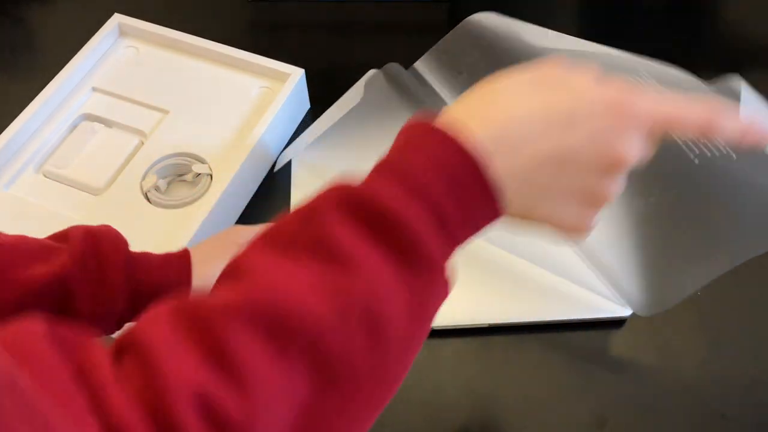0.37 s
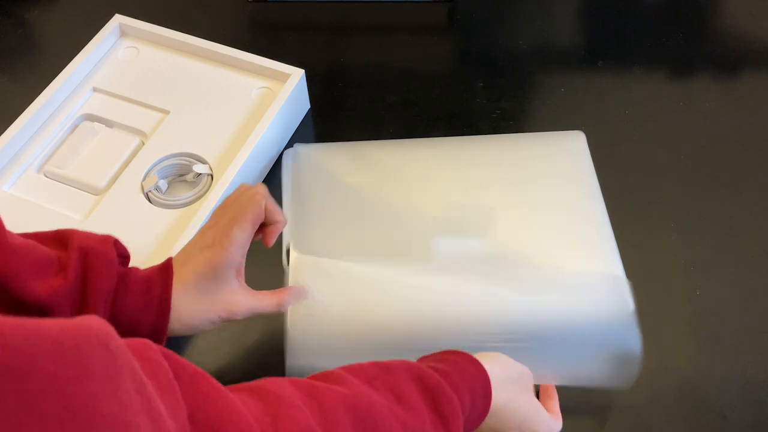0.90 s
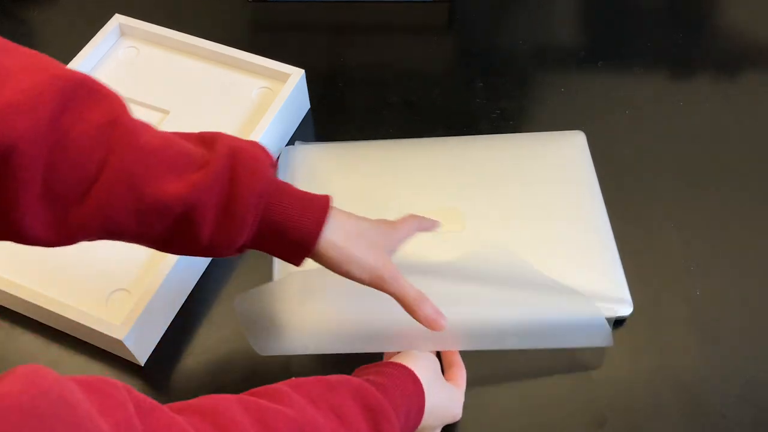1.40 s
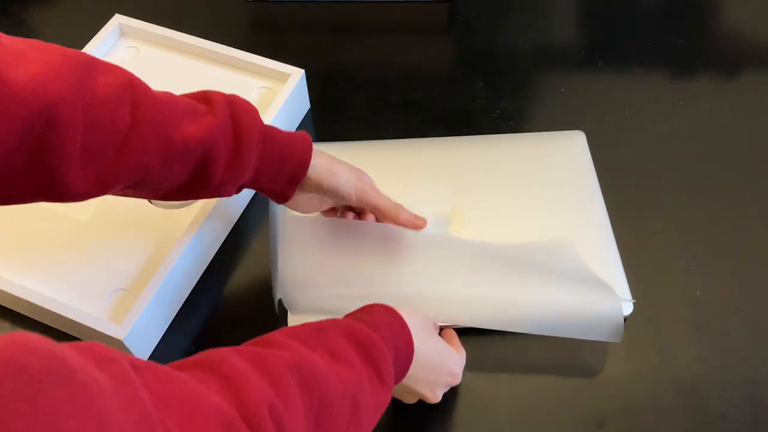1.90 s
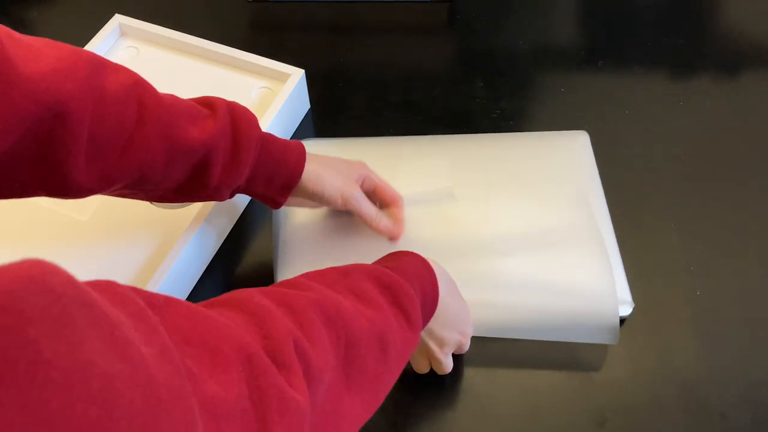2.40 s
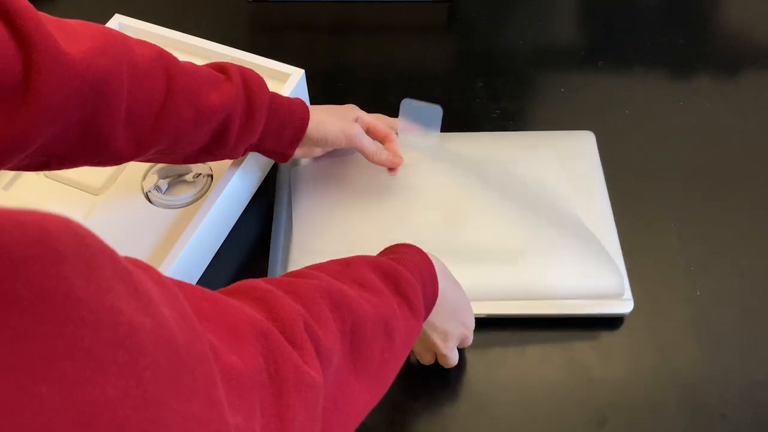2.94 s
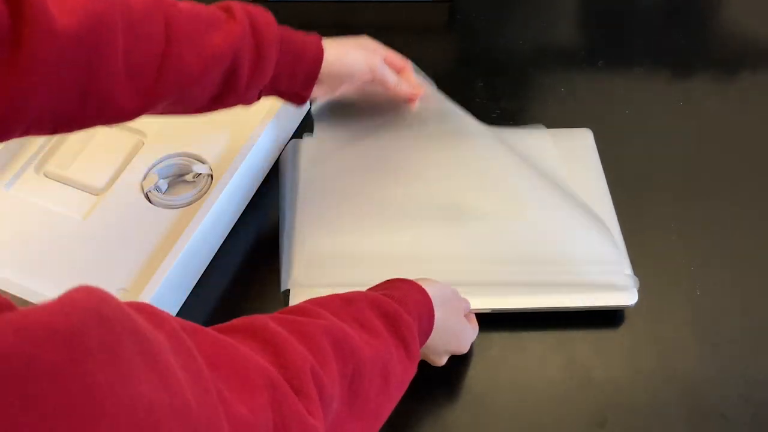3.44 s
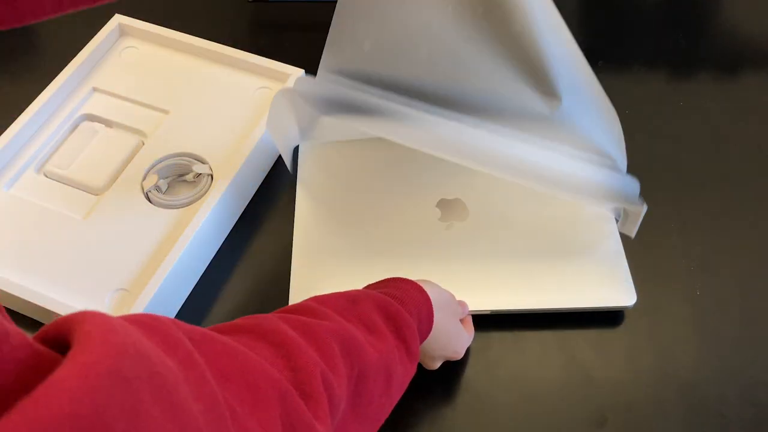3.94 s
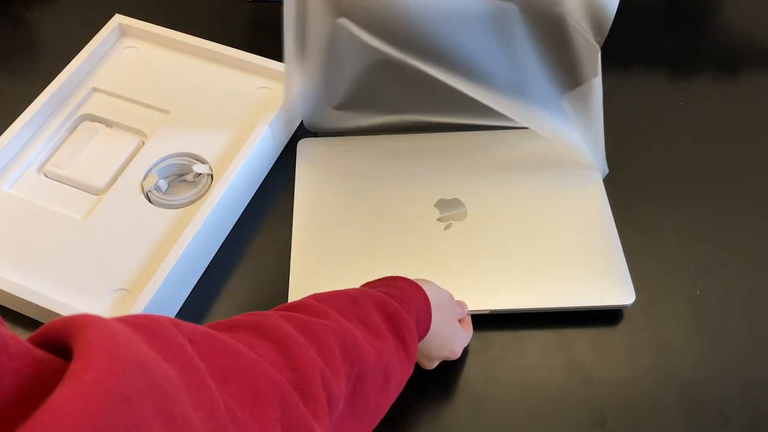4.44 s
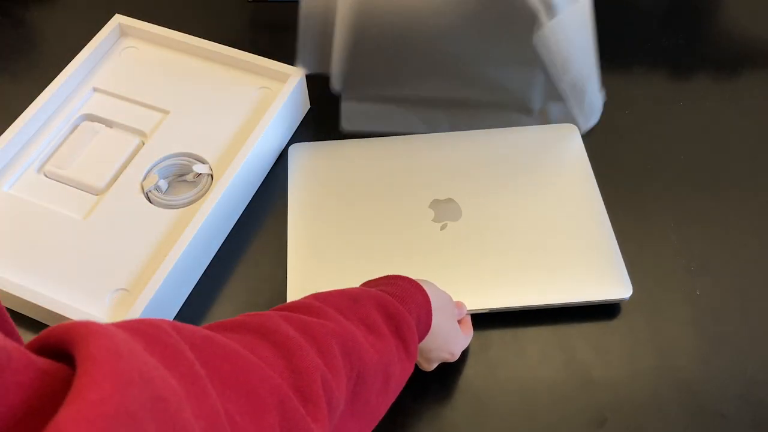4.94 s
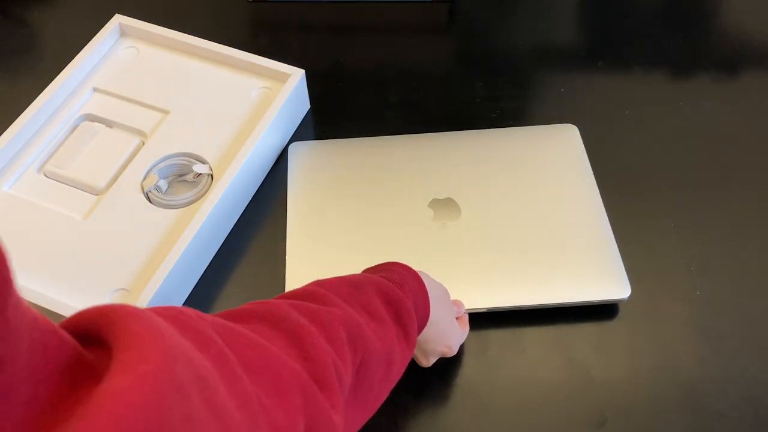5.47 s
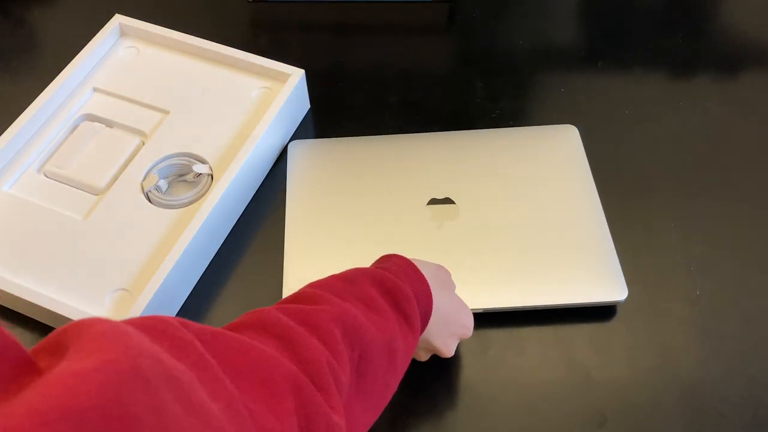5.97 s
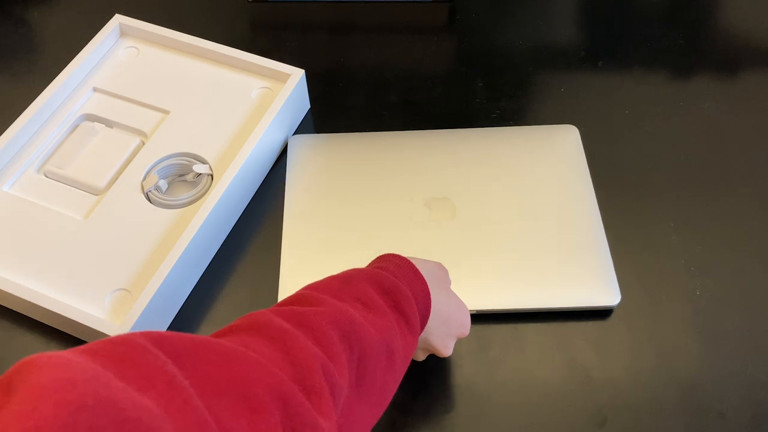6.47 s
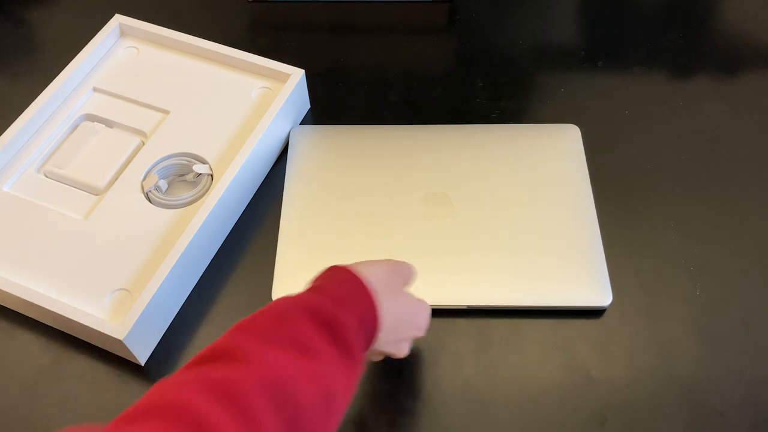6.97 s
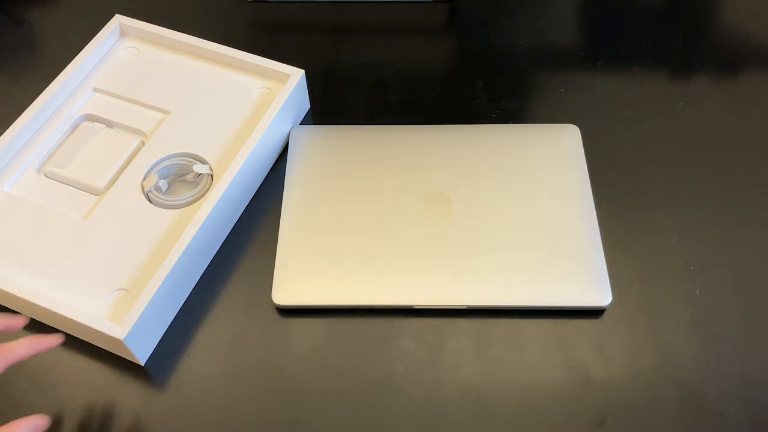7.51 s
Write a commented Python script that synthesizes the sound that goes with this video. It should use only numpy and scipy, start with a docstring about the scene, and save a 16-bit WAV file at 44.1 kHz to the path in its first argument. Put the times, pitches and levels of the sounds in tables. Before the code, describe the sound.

Crisp plastic sheet rustling and snapping, building to a bright burst of peeling, then near quiet with dry clicks, a low bump and a cloth brush.

```python
"""A thin plastic sheet is peeled off a metal case on a table, to one side of a hand-held camera.
It crinkles in grains that follow the hand, snaps in millisecond bursts, and its folds ring briefly.
Dry ticks (short bursts of grains) sound close to the microphone; the case knocks on the table
(decaying sines) and scrapes; a sleeve brushes by as filtered grains; a low room rumble of shaped
noise lies under all."""
import sys
import numpy as np
from scipy import signal
from scipy.fft import rfft, irfft
from scipy.io import wavfile
from scipy.ndimage import uniform_filter1d

SR = 44100
rng = np.random.default_rng(int(sys.argv[2]) if len(sys.argv) > 2 else 0)


def voltage_ratio(level):
    """Linear amplitude factor for a level in decibels (scalar or array-like)."""
    return 10 ** (np.asarray(level, float) / 20)


def unload_audio(sound):
    """Save the sound as a 16-bit wav file, at the path given as the first command line argument."""
    columns = np.transpose(np.atleast_2d(sound))
    # keep every value between -1 and 1, then stretch to whole-number steps
    steps = np.round(np.clip(columns, -1, 1) * 32767)
    wavfile.write(sys.argv[1], SR, steps.astype(np.int16))


N = 336042


def evened(x):
    """Scales to rms 1."""
    return x / np.sqrt(np.mean(x ** 2) + 1e-20)


def read(points, hz):
    """Reads a spectrum table on a log-frequency axis."""
    f, value = np.transpose(points)
    return np.interp(np.log(hz + 1), np.log(f + 1), value)


def colour(x, points):
    """Minimum-phase filter with the given spectrum, keeping the power of white noise."""
    log_gain = np.log(voltage_ratio(read(points, abs(np.fft.fftfreq(4096, 1 / SR)))))
    spectrum = np.exp(np.conj(signal.hilbert(log_gain)))
    taps = np.fft.ifft(spectrum).real[:2048]
    taps = taps / np.linalg.norm(taps)
    return signal.oaconvolve(x, taps[None], axes=1)[:, :N]


def pair(a, b, same, pan_db=0, lead_rad=0):
    """Left hears a; right hears a share of a, the rest from b, lagging in phase and at another level."""
    hz = np.fft.rfftfreq(N, 1 / SR)
    share = np.clip(read(same, hz), -1, 1)
    left = rfft(a)
    right = share * left + np.sqrt(1 - share ** 2) * rfft(b)
    right = right * np.exp(-1j * lead_rad)
    return irfft(np.array([left * voltage_ratio(pan_db / 2), right * voltage_ratio(-pan_db / 2)]), N)


def grains(per_s, spread_db, hiss):
    """Tiny clicks of uneven size in clumps, shared in time by two unlike draws, over some hiss."""
    clump_db = 2.5 * evened(uniform_filter1d(rng.standard_normal(N), 300))
    size_db = spread_db * np.minimum(rng.exponential(1, N), 4)
    size = voltage_ratio(clump_db) * voltage_ratio(size_db) * (rng.random(N) < per_s / SR)
    level = np.sqrt(evened(size) ** 2 + hiss)
    return evened(level * rng.standard_normal((2, N)))


def bursts(s, db, rise_s, fall_s):
    """Envelope of short bursts, each peaking at db."""
    at = np.zeros(N)
    np.add.at(at, np.round(np.asarray(s) * SR).astype(int), voltage_ratio(db))
    t = np.arange(round(min(0.5, 12 * fall_s) * SR)) / SR
    shape = (1 - np.exp(-t / rise_s)) * np.exp(-t / fall_s)
    return abs(signal.oaconvolve(at, shape / shape.max())[:N])


def split(db, tilt_db):
    """Shares a level between body and treble."""
    treble_db = db - 10 * np.log10(2.5 + 10 ** (tilt_db / 10))
    return treble_db + tilt_db, treble_db


def strokes(s, db, swell_ms, fade_ms):
    """Level in dB of overlapping gestures, each swelling to its peak and fading."""
    starting, stopping = 1.3, 1.1  # over 1: sets in and dies out abruptly rather than creeping
    step = 64  # samples
    ms = 1000 * (np.arange(0, N + step, step)[:, None] / SR - s)
    swell = abs(ms) / np.maximum(swell_ms, 3)
    fade = abs(ms) / np.maximum(fade_ms, 3)
    each_db = db - 20 * np.where(ms < 0, swell ** starting, fade ** stopping)
    power = 10 ** (np.maximum(each_db, -150) / 10)
    total_db = 10 * np.log10(power.sum(axis=1))
    return np.interp(np.arange(N) / step, np.arange(len(ms)), total_db)


def patchy(x, patchy_db):
    """Patches of the colour come and go within tens of milliseconds, as in a surface changing shape."""
    z = signal.stft(x, nperseg=256)[2]
    field = rng.standard_normal(z.shape[1:])
    field = uniform_filter1d(uniform_filter1d(field, 4, 0), 14, 1)  # over frequency, then time
    gain = voltage_ratio(patchy_db * evened(field))
    return signal.istft(z * evened(gain), nperseg=256)[1][:, :N]


# room spectrum: f/Hz, level/dB
ROOM_SPECTRUM = [(12, -36.5), (20, -8), (63, -0.5), (94, -0.5), (195, -11), (323, -16), (583, -25.5),
                 (816, -31), (1350, -36.5), (1950, -44), (2890, -45.5), (6000, -45), (7730, -45.5),
                 (15200, -55), (16500, -72)]
# room left-right likeness: f/Hz, likeness/1
ROOM_LIKENESS = [(60, 0.96), (180, 0.99), (550, 0.91), (1650, 0.17), (4970, 0.32), (15000, 0.18)]


def room():
    """Steady rumble of the building and faint hiss: shaped Gaussian noise."""
    level_db, pan_db = -50, -1.3  # pan: left over right
    hz = np.fft.rfftfreq(N, 1 / SR)
    noise = irfft(rfft(rng.standard_normal((2, N))) * voltage_ratio(read(ROOM_SPECTRUM, hz)), N)
    return voltage_ratio(level_db) * pair(*evened(noise), ROOM_LIKENESS, pan_db)


# tugs of the hand: t/s, force/dB, tension (treble over body)/dB, 20 dB swell/ms, 20 dB body fade/ms
HAND_TUGS = [(0.009, -62.5, -2, 74, 128), (0.223, -44.5, 0, 11, 136), (0.357, -57.5, -8.0, 232, 150),
             (0.539, -64.5, -19.5, 20, 129), (0.694, -60, 8.5, 68, 233), (0.736, -40.5, -8.5, 85, 142),
             (0.893, -49, -11, 45, 47), (0.952, -40.5, -2.5, 57, 89), (1.014, -49, 2.5, 64, 150),
             (1.195, -52.5, 2.5, 138, 200), (1.219, -45.5, 3.5, 60, 88), (1.319, -46.5, -1.5, 120, 165),
             (1.424, -62.5, 13.5, 122, 328), (1.51, -57, 1, 91, 606), (1.635, -57.5, 9.5, 68, 168),
             (1.68, -51.5, -16, 47, 245), (1.785, -59.5, 13, 101, 117), (1.904, -59.5, 6.0, 139, 293),
             (1.962, -53.5, -9, 41, 126), (2.114, -54.0, 1.5, 112, 222), (2.235, -63, 3.5, 40, 207),
             (2.288, -49.5, -7.5, 15, 156), (2.449, -51, 1, 75, 161), (2.583, -61.5, 14.0, 140, 208),
             (2.668, -54, -2, 12, 189), (2.718, -49, -2.5, 59, 140), (2.88, -76, 12.0, 129, 63),
             (2.977, -45.5, 0, 19, 138), (3.035, -55, -3, 32, 189), (3.245, -53.5, -7, 23, 94),
             (3.305, -55, 0.5, 89, 94), (3.414, -73, 15.0, 253, 600), (3.47, -56.5, -3, 8, 229),
             (3.523, -51, 15.5, 58, 312), (3.58, -39.5, 11.5, 35, 157), (3.671, -46, 7.5, 113, 102),
             (3.763, -36, 0.5, 123, 131), (3.824, -42.0, -2.5, 121, 152), (3.917, -49, -6.5, 79, 280),
             (4.085, -49.5, -8.0, 92, 265), (4.128, -38, 3.5, 18, 354), (4.19, -33, -2, 35, 244),
             (4.282, -39, 5.5, 15, 90), (4.38, -36, 4, 7, 248), (4.427, -34, -3.5, 85, 251.5),
             (4.59, -39.5, 1.5, 8, 201), (4.69, -42.5, -3.5, 256, 151), (4.745, -36.5, 4, 35, 227),
             (4.795, -34.5, 4.5, 79, 214), (4.866, -41.5, 3, 52, 156), (4.941, -33.5, 3.5, 186, 89),
             (4.962, -36.5, -6.5, 43, 118), (5.014, -47.5, -5, 46, 246), (5.177, -61, -15, 39, 141),
             (5.374, -69.5, 0.5, 146, 126), (5.517, -73, 5, 72, 420), (5.681, -60.5, -20, 112, 140)]


def tugs():
    """Hand force drives body, treble and flap levels in dB; a taut sheet cannot flap."""
    treble_fades_faster = 1.3
    flap_offset_db, flap_lost_per_tension = -10, 0.83
    s, force_db, tension_db, swell_ms, fade_ms = np.transpose(HAND_TUGS)
    body_db = strokes(s, force_db, swell_ms, fade_ms)
    treble_db = strokes(s, force_db + tension_db, swell_ms, fade_ms / treble_fades_faster)
    flap_force_db = force_db + flap_offset_db - flap_lost_per_tension * np.maximum(tension_db, -7)
    return body_db, treble_db, strokes(s, flap_force_db, swell_ms, fade_ms)


POP_RISE_S, POP_FALL_S = 0.00006, 0.0011


def small_pops():
    """Lesser creases pop at chance times and sizes; level is relative to the crinkle."""
    per_s, spread_db, over_db = 90, 2.5, -3
    s, size = rng.random((round(per_s * N / SR), 2)).T
    db = over_db - spread_db * np.maximum(np.log(size), -3)
    return bursts(s * (N - 1) / SR, db, POP_RISE_S, POP_FALL_S)


# creases that pop: t/s, level/dB, body over treble/dB
CREASE_SNAPS = [(0.217, -30.5, -3), (0.2251, -23.5, -7), (0.2299, -18.5, -10), (0.67, -35, -14),
                (0.7096, -36, -8), (0.7269, -20, 5.5), (0.8756, -31, 17), (0.9367, -20.5, -3),
                (1.133, -37.5, 3), (1.1628, -29, -18), (1.211, -19.5, -2), (1.2944, -29, 1),
                (1.3324, -28.5, -11), (2.2834, -25, -5.5), (2.6629, -25.5, -2.5), (2.719, -27, 6),
                (2.9724, -17.5, -6.5), (2.9793, -30, 1), (3.2312, -43, 14), (3.4662, -28, -0.5),
                (3.4978, -31.5, -9.5), (3.5725, -5, -14.5), (3.5969, -13, -17), (3.722, -11.5, -12.5),
                (3.7305, -23, 7), (3.7547, -14.5, -10), (3.7752, -16.5, -1), (3.8197, -13.5, -8.5),
                (3.9931, -30.5, 7), (4.0659, -32.5, 0.5), (4.1231, -10.5, -7), (4.1808, -8.5, -7.5),
                (4.206, -14.5, -0.5), (4.2392, -18.5, 10.5), (4.275, -4, -7.5), (4.281, -26.5, 0),
                (4.315, -21.5, -3.5), (4.3753, -7, -16), (4.383, -10.5, -3.5), (4.3867, -16, -6),
                (4.4207, -7.5, -0.5), (4.4933, -24, -1.5), (4.5853, -7.5, -10), (4.5949, -21, 10),
                (4.656, -22.5, -4.5), (4.7324, -21.5, -3), (4.78, -11.5, -12.5), (4.787, -19.5, 1),
                (4.8735, -15.5, 1), (4.9024, -5, -8), (4.946, -10.5, -4), (4.9799, -20, 1)]


def crinkle_and_pops(body_db, treble_db):
    """Crinkle follows the hand; each pop is a millisecond burst that leaves a dying wash."""
    s, db, tilt_db = np.transpose(CREASE_SNAPS)
    t60s_s, afters_db = (0.31, 0.081), (-24.5, -28)  # wash: body, treble; level under the pop's peak
    lesser = small_pops()
    parts = []
    for pop_db, work_db, t60_s, after_db in zip(split(db, tilt_db), (body_db, treble_db), t60s_s, afters_db):
        work = voltage_ratio(work_db)
        after = bursts(s, pop_db + after_db, 0.0005, t60_s / np.log(1000))
        crinkle = work * grains(per_s=5000, spread_db=2.5, hiss=0.99)
        crinkle += after * rng.standard_normal((2, N))
        pop_level = bursts(s, pop_db, POP_RISE_S, POP_FALL_S) + work * lesser
        pops = pop_level * np.sign(rng.standard_normal((2, N)))
        parts.append((patchy(crinkle, 2.2), pops, np.hypot(work, after)))
    return parts


# body spectrum, sheet pulled: f/Hz, level/dB
BODY_TAUT = [(300, -28.5), (700, -8), (1100, -4.5), (1800, 1.5), (3000, -0.5), (4500, -2), (6000, -8.5),
             (9000, -29.5)]
# body spectrum, sheet handled gently: f/Hz, level/dB
BODY_SLACK = [(300, -26.5), (700, -12.5), (1300, 0.5), (2000, 0), (3000, -6), (4500, -7.5), (6000, -14),
              (9000, -31.5)]
# treble spectrum: f/Hz, level/dB
TREBLE = [(2500, -16), (4500, -1), (6500, 0.5), (8200, 2.5), (10500, -1), (14000, -5.5), (15600, -12),
          (17000, -22.5)]


def crackle(body_db, treble_db):
    """A pulled sheet crinkles brighter: body crossfades slack to taut. Also returns body level."""
    slack_db, taut_db = -50, -43
    parts = crinkle_and_pops(body_db, treble_db)
    (body, body_pops, body_level), (treble, treble_pops, _) = parts
    taut = np.clip((body_db - slack_db) / (taut_db - slack_db), 0, 1)
    out = colour(np.sqrt(taut) * body + body_pops, BODY_TAUT)
    out += colour(np.sqrt(1 - taut) * body, BODY_SLACK)
    out += colour(treble + treble_pops, TREBLE)
    return out, body_level


# flap spectrum: f/Hz, level/dB
FLAP_SPECTRUM = [(120, -7.5), (300, -1.5), (550, -1), (900, -2), (1500, -28.5)]


def flaps(flap_db):
    """The loose sheet flaps: sparse low-pitched grains."""
    return colour(voltage_ratio(flap_db) * grains(per_s=400, spread_db=3, hiss=0.16), FLAP_SPECTRUM)


def notes(hz, cycles):
    """A fold of the sheet rings for a few cycles."""
    t = np.arange(1500) / SR
    return np.sin(2 * np.pi * hz * t) * (1 - np.exp(-t * hz)) * np.exp(-t * hz / cycles)


def buckles(per_s, spread_db, cycles):
    """Small panels of every size keep flipping, each at its own pitch."""
    out = np.zeros((2, N))
    for hz in np.geomspace(800, 4600, num=24):
        at = np.flatnonzero(rng.random(N) < per_s / 24 / SR)
        size_draw, sign_draw = rng.random((2, 2, len(at)))
        size = np.zeros((2, N))
        size[:, at] = voltage_ratio(spread_db * np.minimum(-np.log(size_draw), 4)) * np.sign(sign_draw - 0.5)
        out += signal.oaconvolve(size, notes(hz, cycles)[None], axes=1)[:, :N]
    return evened(out)


# broad folds that flip over: t/s, level/dB, f/Hz
FOLD_FLIPS = [(1.677, -29.5, 1390), (1.744, -33.5, 410), (1.956, -33.5, 1290), (2.179, -34, 328),
              (2.286, -24, 1260), (2.453, -30.5, 1370), (2.593, -39, 296), (3.774, -17, 1800),
              (3.923, -30, 1810), (4.901, -22, 1950)]


def flips():
    """Broad folds flip over, each with a short hollow note."""
    out = np.zeros((2, N))
    for s, db, hz in FOLD_FLIPS:
        out[:, round(s * SR):][:, :1500] += voltage_ratio(db) * notes(hz, cycles=1.63)
    return out


def echoes(x, echo_db):
    """Table, case and walls send back a short scatter of reflections."""
    t = np.arange(SR // 8) / SR
    hits = rng.random((2, len(t))) < 0.05
    tail = rng.standard_normal((2, len(t))) * hits * np.exp(-t / 0.0086) * (t > 0.001)
    tail = tail / np.linalg.norm(tail[0])
    return x + voltage_ratio(echo_db) * signal.oaconvolve(x, tail, axes=1)[:, :N]


# sheet left-right likeness: f/Hz, likeness/1
SHEET_LIKENESS = [(100, .95), (400, .8), (700, .55), (2000, .55), (3500, .45), (5500, .9), (8500, .985),
                  (12000, .995), (16000, .985)]
# sheet pan: f/Hz, left over right level/dB
SHEET_PAN_DB = [(60, 7), (150, 1), (380, -0.5), (950, -2.5), (2380, -3), (5980, 0.5), (15000, -0.5)]
# phase by which left leads right: f/Hz, phase/rad
SHEET_LEAD_RAD = [(0, 0), (700, -.8), (1500, .5), (4100, 1.5), (5300, np.pi), (8500, 2 * np.pi),
                  (11900, 3 * np.pi), (15300, 4 * np.pi)]


def sheet():
    """One hand drives crackle, flaps and buckles; folds flip; the sum echoes, off to one side."""
    body_db, treble_db, flap_db = tugs()
    out, body_level = crackle(body_db, treble_db)
    out += flaps(flap_db)
    out += voltage_ratio(-11) * body_level * buckles(per_s=500, spread_db=4.5, cycles=11)
    out += flips()
    hz = np.fft.rfftfreq(N, 1 / SR)
    lead_rad = np.interp(hz, *np.transpose(SHEET_LEAD_RAD))
    return pair(*echoes(out, echo_db=-9), SHEET_LIKENESS, read(SHEET_PAN_DB, hz), lead_rad)


def faint_ticks():
    """Rows of small ticks at chance moments once the sheet is off."""
    start_s, end_s, per_s = 5.25, 7.6, 8
    level_db, level_spread_db, tilt_db, tilt_spread_db = -59, 3, 7, 8  # spreads: standard deviations
    s, size, tone = rng.random((round(per_s * (end_s - start_s)), 3)).T
    unit = 2 * np.sqrt(3)  # gives a uniform draw a standard deviation of 1
    return np.transpose([start_s + s * (end_s - start_s),
                         level_db + level_spread_db * unit * (size - 0.5),
                         tilt_db + tilt_spread_db * unit * (tone - 0.5)])


# dry ticks in front of the microphone: t/s, level/dB, body over treble/dB
NEAR_TICKS = [(0.1137, -35.5, 1), (0.158, -47.5, -8), (0.3988, -41, -15), (0.614, -32.5, -12.5),
              (2.1386, -28, -3.5), (2.1834, -40.5, 7), (2.8957, -43, -5), (3.9378, -31.5, -17),
              (5.171, -30, -5), (5.2661, -45, 10), (5.3107, -54, 0), (5.3985, -53.5, 7), (5.5177, -53, 10),
              (5.6638, -51, 11), (5.6755, -54, -2), (5.7616, -52, 7.5), (5.851, -54.5, 12),
              (5.8913, -55, -12), (6.0914, -55, 18), (6.1445, -51, 10), (7.417, -52.5, 10),
              (7.5122, -55.5, -9), (5.6017, -45.5, 11), (5.6296, -43, -19), (5.9703, -45, -18),
              (6.0289, -24, 8.5), (6.0537, -51, -1), (6.1764, -38.5, 3.5), (6.2998, -42, -5),
              (6.3168, -39.5, 1.5), (6.325, -45.5, -9), (6.353, -47, 6), (6.383, -43, 3),
              (6.4718, -46.5, -3), (6.535, -49, 12), (6.568, -36.5, -4), (6.713, -49.5, 0),
              (6.7491, -37, -5), (6.8247, -51.5, 2), (6.8862, -30, 0.5), (6.948, -50, -13),
              (6.9596, -45.5, -1), (7.05, -41.5, -1), (7.0712, -48.5, 4), (7.1114, -39.5, 7.5),
              (7.1815, -45, 12), (7.221, -36.5, 2.5), (7.4325, -38.5, 4), (7.4855, -48.5, 1.5)]
# tick body spectrum: f/Hz, level/dB
TICK_BODY_SPECTRUM = [(150, 5.5), (400, -0.5), (1000, 0.5), (2500, -2.5), (4500, -2.5), (7000, -29)]
# tick treble spectrum: f/Hz, level/dB
TICK_TREBLE_SPECTRUM = [(2500, -13), (5000, 1), (8000, 1), (11000, -5), (15000, -15), (17000, -12.5)]


def ticks():
    """Dry clicks of a few ms each, as of a hand on the camera, too close and faint to wake the room."""
    s, db, tilt_db = np.vstack([NEAR_TICKS, faint_ticks()]).T
    parts = []
    for part_db, spectrum in zip(split(db, tilt_db), (TICK_BODY_SPECTRUM, TICK_TREBLE_SPECTRUM)):
        before = bursts(N / SR - s, part_db - 7, 0.0002, 0.0013)[::-1]  # time-reversed
        level = before + bursts(s, part_db, 0.00031, 0.0023)
        parts.append(colour(level * grains(per_s=4000, spread_db=0.5, hiss=0.24), spectrum))
    return pair(*sum(parts), [(500, 1.0), (5000, 0.94), (14000, 0.1)])


# case meets table: t/s, level/dB, softness (rise)/s, scrape level/dB
CASE_KNOCKS = [(1.744, -53, .002, -47.5), (2.178, -56, 0.0012, -70), (4.374, -51, .002, -37.5),
               (4.73, -46, 0.0041, -55), (4.945, -40.5, 0.01, -45.5), (6.028, -53.5, 0.0009, -59.5),
               (6.536, -23, 0.05, -41.5)]
# table modes: f/Hz, level/dB, t60/s
TABLE_MODES = [(130.6, 4.5, 0.24), (255, 2.5, 0.16), (328, 4.5, 0.045), (470, -19.5, .15), (734, -21, 0.13),
               (780, -19.5, .06), (1080, -14.5, .05), (1500, -17.5, 0.037)]
# scrape spectrum: f/Hz, level/dB
SCRAPE_SPECTRUM = [(100, -5), (300, 12.5), (1000, 3), (2000, -5.5), (3500, -20), (5000, -40)]


def knocks():
    """The table top swings up over the length of the push and rings; the case scrapes as it settles."""
    out = np.zeros((2, N))
    t = np.arange(SR // 2) / SR
    ring = np.zeros(len(t))
    for phase_rad, (hz, db, t60_s) in enumerate(TABLE_MODES):
        ring += voltage_ratio(db - 60 * t / t60_s) * np.sin(2 * np.pi * hz * t + phase_rad)
    for s, db, soft_s, _ in CASE_KNOCKS:
        out[:, round(s * SR):][:, :len(t)] += voltage_ratio(db) * (1 - np.exp(-t / soft_s)) * ring
    s, _, _, scrape_db = np.transpose(CASE_KNOCKS)
    scrape = bursts(s, scrape_db, 0.001, 0.054) * grains(per_s=830, spread_db=1.5, hiss=1.4)
    return out + pair(*colour(scrape, SCRAPE_SPECTRUM), [(200, 0.96), (2000, 0.24)])


# cloth and fingers moving close by: t/s, level/dB, 20 dB swell/ms, 20 dB fade/ms
BRUSH_STROKES = [(5.99, -63, 20, 60), (6.038, -66, 40, 150), (6.15, -62, 150, 150), (6.318, -70, 300, 300),
                 (6.551, -67, 30, 400), (6.757, -58.5, 15, 38), (6.895, -68.5, 50, 150),
                 (7.1, -66.5, 300, 400), (7.25, -48, 5.5, 198), (7.4, -71, 200, 400)]
# cloth spectrum: f/Hz, level/dB
CLOTH_SPECTRUM = [(500, -10), (1200, -5), (2500, -3.5), (3500, -5.5), (4800, -9.5), (8000, -14),
                  (14500, -28.5), (16500, -36.5)]


def brush():
    """Fine friction of cloth fibres: dense grains under slow strokes."""
    level = voltage_ratio(strokes(*np.transpose(BRUSH_STROKES)))
    friction = patchy(level * grains(per_s=5600, spread_db=2.5, hiss=1.5), 3.3)
    return pair(*colour(friction, CLOTH_SPECTRUM), [(500, 0.8), (5000, 0.226), (14000, 0.52)])


def scene():
    """All sources at the microphone pair."""
    return room() + sheet() + ticks() + knocks() + brush()


def roll_off(x):
    """The treble ends steeply here."""
    return signal.sosfilt(signal.butter(12, 17000, fs=SR, output="sos"), x)


def record(dry):
    """Band limit: linear-phase low-pass."""
    edge_hz = 16100
    edge = signal.firwin(255, edge_hz, window=("kaiser", 9), fs=SR)
    mix = signal.oaconvolve(dry, edge[None], "same")
    return roll_off(mix)


dry = scene()
out = record(dry)
unload_audio(out)
```